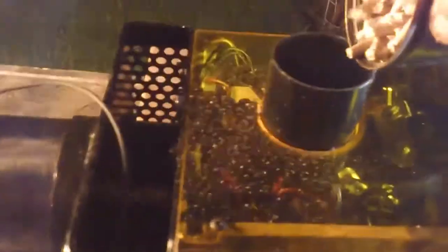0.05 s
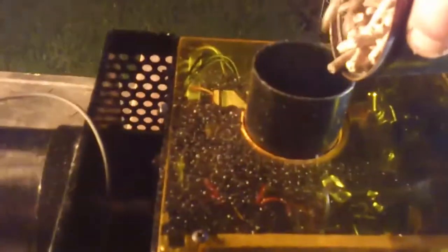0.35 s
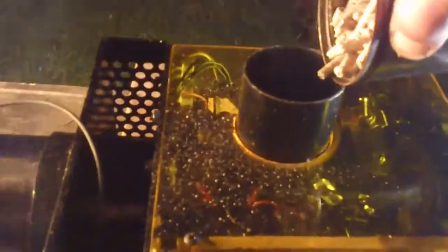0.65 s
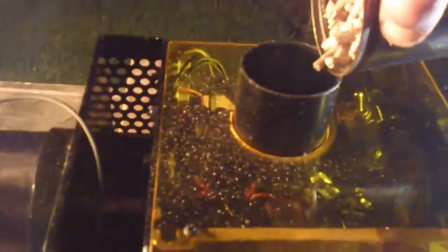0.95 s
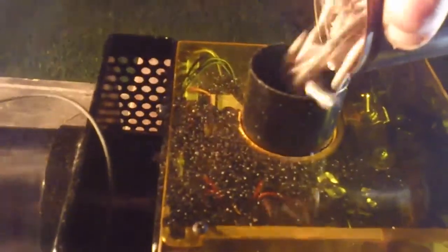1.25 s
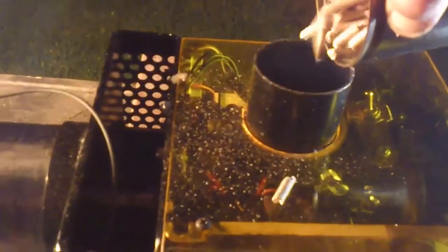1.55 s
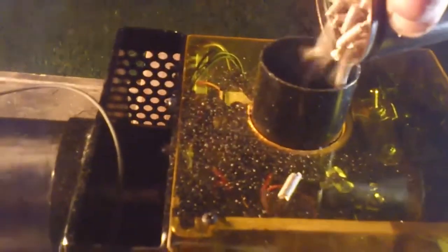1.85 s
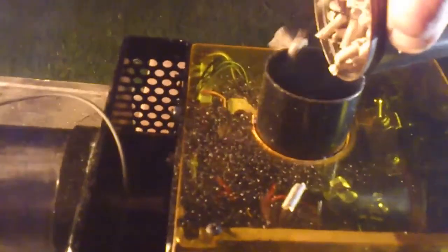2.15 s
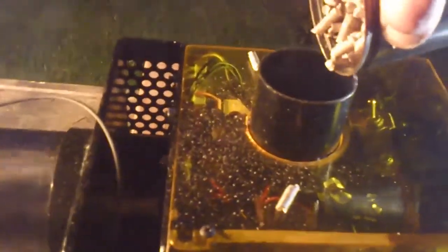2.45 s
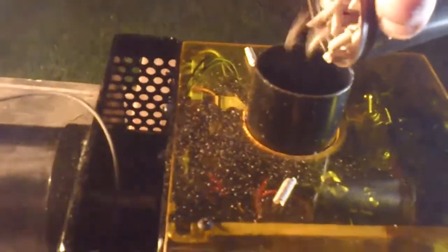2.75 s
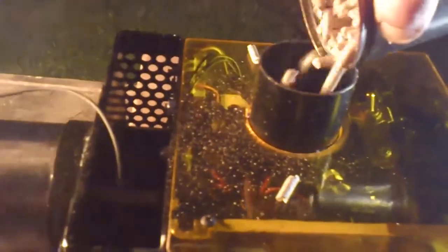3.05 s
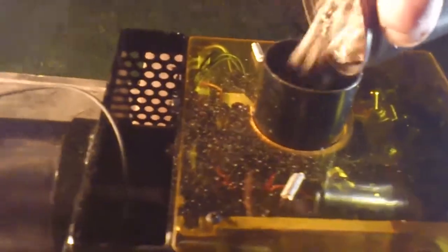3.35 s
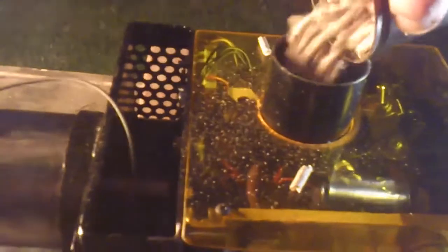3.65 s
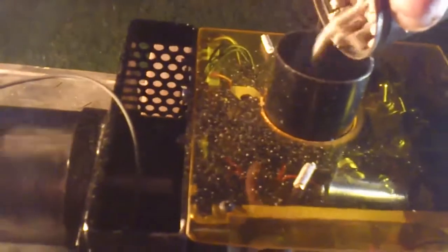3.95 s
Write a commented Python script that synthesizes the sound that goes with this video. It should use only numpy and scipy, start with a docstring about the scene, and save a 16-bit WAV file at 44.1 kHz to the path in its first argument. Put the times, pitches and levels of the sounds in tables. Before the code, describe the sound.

Wood pellets poured in spurts, clicking and ringing on a metal tube while a blower runs.

```python
"""At a steel feed tube, wood pellets are shaken from a scoop over the low roar of a running blower.
A few single pellets fall first, then two cascades. They set the tube wall ringing, knock on each
other, tick on the hard rim and thud on the housing, while the rest rustle in the scoop.
Faint high swishes glide through the lulls, and the room gives the pellets a short echo."""
import sys
import numpy as np
from scipy import signal
from scipy.fft import rfft, irfft
from scipy.io import wavfile

SR = 44100
rng = np.random.default_rng(int(sys.argv[2]) if len(sys.argv) > 2 else 0)


def master_out(mix):
    """Clip the mix to full scale and print it as 16-bit PCM to the path in sys.argv[1]."""
    frames = np.transpose(np.atleast_2d(mix))
    ceiling = np.clip(frames, -1, 1)
    pcm = np.round(ceiling * 32767).astype(np.int16)
    wavfile.write(sys.argv[1], SR, pcm)


N = 176400
TIME = np.arange(N) / SR
START_DELAY_S = 0.0008  # each hit sounds this long after its listed time
CRUSH_S = 0.00067  # a crumbly pellet builds up its force gradually
CUTOFF_HZ = 15900

# how strong the pour is over time: time_s, level_db
POUR_STRENGTH = [(0,-8),(.66,-10),(.85,-20),(1.15,-31.5),(1.3,-12),(1.45,-2),(1.58,0.5),(1.72,-3.5),(1.9,2),(2.06,-1),(2.25,-11),(2.52,-13),(2.62,-36.5),(2.92,-29.5),(3.12,-15),(3.33,-7),(3.42,-2.5),(3.66,0),(3.84,-4.5),(4,-3)]
# tone colour of a hard click: pitch_hz, level_db
CLICK_SPECTRUM = [(900,-47),(1800,6.5),(4000,3.5),(5200,3),(10000,4.5),(12500,-6),(16000,-8)]


def loud_pellets():
    """The pellets that stand out one by one, on the rim, the housing, each other and the tube wall."""
    # hits on the wall: start_s, level_db, treble_db, ring_db, place (a spot on the wall, about -1 to 1)
    wall_hits = [(.0014,-10.5,-18,5,0.29), (.134,-11,-30,-11,-0.51), (.2204,-21,-14,-3,0.17),
                 (.3296,-18,-23,-2,-0.49), (.3444,-26,-21.5,-1,-.8), (.4586,-18.5,-19,0,-1),
                 (.4826,-12,-26,1.5,-.9), (.6274,-21.5,-9,2,-0.16), (.6389,-11,-22,1,-0.45),
                 (.7233,-25,-29,2.5,-0.85), (1.3272,-15.5,-17,0.5,-0.55), (1.3835,-18,-19,-5,0.32),
                 (1.4044,-12,-14,0,-0.19), (1.421,-14,-21.5,-9,.3), (1.4322,-15.5,-22,-2,0.7),
                 (1.474,-13,-18,4,0), (1.501,-10.5,-20,-5.5,0.9), (1.572,-15,-20.5,-8,0.13),
                 (1.6305,-16,-14,-6,0.31), (1.6905,-13,-16,-6,-.3), (1.7105,-21,-30,-9,0),
                 (1.8712,-11,-21,-3,-.5), (1.9037,-13,-12,1,0), (1.926,-19.5,-18,-6,0),
                 (1.94,-17,-12,-2,0.3), (1.9695,-13.5,-17,-4,0.11), (1.989,-16,-20,3,0.15),
                 (2.0536,-23,-14,9,0.12), (2.1018,-15.5,-23,-6,.1), (2.1325,-19,-26,-3,-.3),
                 (2.193,-13,-40,2,-0.27), (2.435,-11,-32,-6,0.17), (2.4476,-23.5,-13,7,-0.44),
                 (2.5396,-18,-28,0.5,0.057), (2.6594,-28,-29,-1,-0.23), (2.8978,-14.5,-28,0,1.03),
                 (3.0798,-10.5,-17.5,0.5,-0.14), (3.1767,-12,-23,-5.5,0.6), (3.2245,-23,-20,-4,.2),
                 (3.3095,-21,-21,-2.5,0), (3.3568,-19,-22,2.5,0.75), (3.4067,-18.5,-14,3,-0.48),
                 (3.4565,-17.5,-18,-1,.1), (3.5345,-20,-24,-6,-.3), (3.5602,-15,-28,-4,0),
                 (3.6137,-23,-12,-2,-.2), (3.662,-11.5,-18,0,.2), (3.6755,-12.5,-22,-5,-.4),
                 (3.694,-18,-22,0,0), (3.7225,-17,-19,-2,.6), (3.741,-18.5,-17,-2,0),
                 (3.7714,-19.5,-10,-2.5,0.095), (3.7988,-19,-34,2,1.5), (3.845,-23.5,-24,-11,0.38),
                 (3.918,-17.5,-12,2,0.11), (3.9369,-16.5,-3,-0.5,0.82)]
    # wood on wood: start_s, level_db, pitch_hz
    wood_hits = [(0.173, -9.5, 4010), (0.278, -16, 3420), (0.3097, -14, 4780), (0.3282, -20, 6300),
                 (0.3716, -13.5, 4540), (0.3885, -11, 3520), (0.6828, -20.5, 5900), (1.0885, -26.5, 4600),
                 (1.2226, -21.5, 3860), (1.2451, -18, 4600), (1.272, -14.5, 4930), (1.288, -20.5, 4950),
                 (1.3114, -15, 3320), (1.4703, -14, 5400), (1.5191, -9, 3230), (1.551, -16, 4100),
                 (1.5979, -8.5, 3830), (1.605, -9, 3640), (1.6135, -17, 3820), (1.7625, -18.5, 4150),
                 (1.7809, -9, 3470), (1.8631, -18, 3610), (1.9683, -17, 3530), (1.98, -15, 3900),
                 (1.9986, -13.5, 5570), (2.1936, -13.5, 4500), (2.3194, -18, 4600), (2.694, -21, 4200),
                 (3.1083, -17.5, 3230), (3.2527, -15.5, 4000), (3.273, -13, 3410), (3.3668, -11, 3550),
                 (3.47, -16.5, 4120), (3.5344, -10.5, 6230), (3.5715, -16, 4800), (3.641, -17.5, 4200),
                 (3.6932, -14.5, 4060), (3.7004, -10.5, 4060), (3.7228, -14, 4140), (3.8678, -13, 3350),
                 (3.9867, -14.5, 3760)]
    # landings on the housing: start_s, level_db, pitch_hz
    housing_hits = [(1.087,-16.5,830),(1.317,-16.5,2200),(1.520,-16,1370),(1.605,-12.5,1450),(1.614,-18,1600),(2.019,-17,1290),(2.095,-21.5,1080),(3.795,-19.5,950)]
    return rim_ticks() + housing_thuds(housing_hits) + wood_knocks(wood_hits) + tube_pings(wall_hits)


def tube_pings(hits):
    """Steel cracks, clangs and rings when hit; where a pellet lands decides which tones ring most."""
    # the tube's own tones: pitch_hz, level_db, fade_s, place_gain_db (per unit of place)
    tube_tones = [(1433,-14,0.069,10), (3097,-12,0.15,10.5), (4016,-5.5,0.047,-8.5), (4835,-6,.07,-2),
                  (5630,-11,0.054,-7), (5730,-8,0.12,10), (6030,-7,0.071,4), (6180,-2,0.051,-14),
                  (6820,-7,0.092,4), (6985,-9.5,.11,-2.5), (7570,-9.5,0.18,-5), (7690,-9.5,0.094,-1),
                  (8320,-7.5,0.18,-5), (8870,-8,0.084,-2), (8800,-5.5,0.082,-6), (9280,-2.5,0.11,0),
                  (10561,-7,0.045,-1), (11600,-19,0.048,4), (12100,-18.5,.055,1)]
    # tone colour of the wall's dense, short clang: pitch_hz, level_db
    clang_spectrum = [(900,-3.5),(2500,-7.5),(3600,0),(6000,6),(7500,-1),(9000,2.5),(10500,-0.5),(12000,-17),(16000,-23)]
    out = np.zeros(N)
    start_s, level_db, treble_db, ring_db, place = np.transpose(hits)
    starts = np.clip(((start_s + START_DELAY_S) * SR).astype(int), 0, N - 1)
    chance = rng.standard_normal((len(hits), len(tube_tones), 2, 2))
    for k, (hz, tone_db, fade_s, place_gain_db) in enumerate(tube_tones):
        strength_db = level_db + ring_db + tone_db + place * place_gain_db + treble_lift(treble_db, hz)
        # each tone is a close pair, and the upper twin is weaker
        for twin, (detune, twin_db) in enumerate([(-0.0021, -20), (0.0021, -23.5)]):
            size, sign = chance[:, k, twin].T
            force = from_db(strength_db + twin_db + 6 * np.clip(size, -1, 1)) * np.sign(sign)
            clicks = np.bincount(starts, force, N)
            out += ring(clicks, hz * (1 + detune * rng.random()), fade_s)
    for start_s, level_db, treble_db, _, _ in hits:
        colour = lambda f: at_hz(clang_spectrum, f) + treble_lift(treble_db, f)
        crack = from_db(level_db - 8) * burst(colour, fade_s=0.011)
        clang = from_db(level_db - 10.5) * burst(colour, fade_s=0.07)
        add(out, start_s, crack + clang)
    return out


def treble_lift(treble_db, hz):
    """Harder hits reach higher: a change in dB that acts mostly above 10 kHz."""
    return (treble_db + 26.5) * at_hz([(10000, 0.089), (12000, 1)], hz)


def wood_knocks(hits):
    """Two pellets meet with a crack, a clink and a snap, near a pitch set by the pellet's length."""
    out = np.zeros(N)
    for start_s, level_db, hz in hits:
        dull_db = 0.68 * min(level_db - 1, 0)  # gentle knocks lose treble
        treble_loss = lambda f: at_hz([(7000, 0), (13000, dull_db)], f)
        click = lambda f: from_db(at_hz(CLICK_SPECTRUM, f) - 8)
        colour = lambda f: hump(f, hz, width_oct=0.38, floor=click(f)) + treble_loss(f)
        crack = burst(colour, fade_s=0.0093)
        bending_hz = hz * 2 ** (0.22 * rng.uniform(-0.9, 1, 3))  # the pellet flexes at three pitches
        clink = sum(fading_tone(f, fade_s=0.025, size=2048) for f in bending_hz)
        snap = fading_tone(hz, fade_s=0.00022, size=256)  # the spike of contact
        add(out, start_s, from_db(level_db - 3) * crack)
        add(out, start_s, from_db(level_db - 14.5) * clink)
        add(out, start_s + CRUSH_S, from_db(level_db - 4) * snap)
    return out


def rim_ticks():
    """The hard rim answers at once with a bright click."""
    # hits on the rim: start_s, level_db, body_db (more body gives more sound below about 4 kHz)
    rim_hits = [(0.1716, -16.5, -13), (1.7417, -9.5, -20), (1.7738, -11, -11), (1.8345, -23, -20),
                (1.9172, -13, -34), (2.036, -19.5, -26), (2.053, -15.5, -33), (2.332, -15.5, -14.5),
                (2.363, -9.5, -15.5), (2.4702, -10, -15.5), (2.514, -12.5, -15), (2.8978, -16, -22),
                (3.057, -18, -30), (3.2345, -20.5, -17.5), (3.287, -20.5, -19), (3.48, -20, -22.5),
                (3.5348, -16, -9), (3.548, -20, -15), (3.593, -20, -30), (3.662, -15, -26),
                (3.908, -20, -11)]
    out = np.zeros(N)
    for start_s, level_db, body_db in rim_hits:
        colour = lambda f: at_hz(CLICK_SPECTRUM, f) + at_hz([(3500, body_db + 10), (5500, 0)], f)
        add(out, start_s, from_db(level_db - 5) * burst(colour, fade_s=0.021, rise_s=0.0001))
    return out


def housing_thuds(hits):
    """Pellets land on the housing with a duller, hollow sound."""
    return from_db(-7) * taps(hits, width_oct=0.57, fade_s=0.042)


def pour():
    """The mass of small contacts in the pour, over the rustle of the scoop."""
    rustle = scoop_rustle()
    treble_db, ring_db = -28.5, -2  # glancing touches ring less; they land anywhere on the wall
    pings = tube_pings([(start_s, level_db, treble_db, ring_db, rng.uniform(-1.2, 1))
                        for start_s, level_db in random_hits(per_s=160, level_db=-26)])
    knocks = wood_knocks(with_pitch(random_hits(per_s=100, level_db=-28), hz=3750, spread_oct=0.445))
    thuds = housing_thuds(with_pitch(random_hits(per_s=70, level_db=-32), hz=1490, spread_oct=0.445))
    splinter_hits = with_pitch(random_hits(per_s=140, level_db=-26.5), hz=10200, spread_oct=0.41)
    splinters = taps(splinter_hits, width_oct=0.41, fade_s=0.0067)
    return rustle + pings + knocks + thuds + splinters


def random_hits(per_s, level_db):
    """Rows of start_s, level_db. The settings are for full flow; less flow gives fewer, softer hits."""
    flow_db = np.interp(TIME, *np.transpose(POUR_STRENGTH))
    lands = rng.random(N) < per_s * from_db(flow_db) / SR
    size_db = 3.5 * np.clip(rng.standard_normal(N), -2, 2)
    return np.column_stack([TIME, level_db + flow_db / 2 + size_db])[lands]


def with_pitch(hits, hz, spread_oct):
    """Give every hit a random pitch of its own, near hz."""
    return np.column_stack([hits, hz * 2 ** (spread_oct * rng.uniform(-0.93, 1, len(hits)))])


def scoop_rustle():
    """Pellets slide over each other in the scoop, louder as the pour grows."""
    # tone colour of the sliding: pitch_hz, level_db
    rustle_spectrum = [(1000,-2),(3000,1),(5000,5),(9000,-10),(11000,-4),(16000,2)]
    flow_db = np.interp(TIME, *np.transpose(POUR_STRENGTH))
    return from_db(flow_db - 44) * noise(lambda f: at_hz(rustle_spectrum, f), N)


def blower():
    """Moving air makes a steady low roar with a few humming tones in it."""
    # tone colour of the roar: pitch_hz, level_db
    roar_spectrum = [(15,-22),(30,-3),(50,-8),(75,-7),(110,-4.5),(160,-0.5),(195,-1.5),(230,-5),(275,-2),(335,1.5),(395,-3.5),(455,-0.5),(550,-9.5),(750,-10),(900,-22),(1030,-19.5),(1180,-26.5),(1450,-24),(2000,-31),(2700,-41),(5000,-41),(8500,-48),(11000,-52),(16000,-99)]
    # narrow tones at which the blower hums: pitch_hz, level_db
    hum_tones = [(344,-40.5),(452,-39.5),(1480,-57)]
    hum = sum(from_db(level_db) * airy_tone(hz, width_hz=26.4) for hz, level_db in hum_tones)
    roar = from_db(-23.5) * noise(lambda f: at_hz(roar_spectrum, f), N)
    return roar + hum


def swishes():
    """Thin, high swishes swell, glide in pitch and fade."""
    # one row for each swish: level_db, list of (time_s, pitch_hz)
    glides = [(-49.5, [(.3,7860),(.42,8800),(.5,8900),(.62,8350),(.76,8500),(.87,8650),(.99,7600)]),
              (-58, [(.72,7300),(.88,7400),(.96,6900),(1.04,6400)]),
              (-56, [(2.66,7300),(2.72,7100),(2.78,7900),(2.83,7400)])]
    out = np.zeros(N)
    for level_db, glide in glides:
        time_s, pitch_hz = np.transpose(glide)
        progress = np.clip((TIME - time_s[0]) / (time_s[-1] - time_s[0]), 0, 1)
        swell = 2 * np.sqrt(progress * (1 - progress))
        out += from_db(level_db) * swell * airy_tone(np.interp(TIME, time_s, pitch_hz), width_hz=230)
    return out


def room_echo():
    """The room's short, blurred answer to one click, with a total energy of 1."""
    tail = burst(lambda f: at_hz([(4000, 19), (16000, -2)], f), fade_s=0.17, size=16384)
    return tail / np.sqrt(np.sum(tail ** 2))


def taps(hits, width_oct, fade_s):
    """Short contacts, each a burst of noise around its own pitch."""
    out = np.zeros(N)
    for start_s, level_db, hz in hits:
        add(out, start_s, from_db(level_db) * burst(lambda f: hump(f, hz, width_oct), fade_s))
    return out


def burst(colour, fade_s, rise_s=CRUSH_S, size=4096):
    """Fading noise: many close tones struck at once, with a different uneven colour each time."""
    t = TIME[:size]
    bands_hz = np.linspace(0, CUTOFF_HZ, 28)
    uneven_db = 3 * rng.standard_normal(len(bands_hz))
    grain = noise(lambda f: colour(f) + np.interp(f, bands_hz, uneven_db), size)
    return grain * fade(t, fade_s) * (1 - np.exp(-t / rise_s))


def ring(clicks, hz, fade_s):
    """Each click starts a fading tone as strong as the click."""
    shrink, angle = fade(1 / SR, fade_s), 2 * np.pi * hz / SR  # per sample
    return signal.lfilter([0, np.sin(angle)], [1, -2 * shrink * np.cos(angle), shrink ** 2], clicks + 1e-18)


def fading_tone(hz, fade_s, size):
    """One pure tone that dies away, size samples long."""
    t = TIME[:size]
    return np.sin(2 * np.pi * hz * t) * fade(t, fade_s)


def airy_tone(hz, width_hz):
    """A narrow, restless band of noise around a pitch."""
    phase = 2 * np.pi * np.cumsum(hz * np.ones(N)) / SR
    slow = lambda f: -20 * np.log10(1 + (f / width_hz) ** 2)
    return noise(slow, N) * np.cos(phase) + noise(slow, N) * np.sin(phase)


def noise(colour, size):
    """Noise of strength 1 (rms); colour(hz) says in dB how much of each pitch it holds."""
    hz = np.maximum(np.arange(size // 2 + 1) * SR / size, 1)
    shaped = irfft(rfft(rng.standard_normal(size)) * from_db(colour(hz)), size)
    return shaped / shaped.std()


def hump(f, hz, width_oct, floor=1e-3):
    """A tone colour in dB: a broad hill around hz, standing on a low floor."""
    return 20 * np.log10(np.exp(-0.5 * (np.log2(f / hz) / width_oct) ** 2) + floor)


def at_hz(points, hz):
    """Read between a table's points, with pitch counted in octaves."""
    pitches, values = np.transpose(points)
    return np.interp(np.log(hz), np.log(pitches), values)


def fade(t, fade_s):
    """A gain that falls by 60 dB in fade_s seconds."""
    return np.exp(-np.log(1000) * t / fade_s)


def from_db(db):
    """Turn decibels into a gain."""
    return 10 ** (np.asarray(db) / 20)


def add(out, start_s, sound):
    """Mix a sound in, just after start_s."""
    i = int(np.clip((start_s + START_DELAY_S) * SR, 0, N - 1))
    out[i:i + len(sound)] += sound[:N - i]


def scene():
    """The pellets and their echo, over the blower and the swishes."""
    background = blower() + swishes()
    room = room_echo()
    pellets = loud_pellets() + pour()
    echo = from_db(-18) * signal.fftconvolve(pellets, room)[:N]
    return (pellets + echo + background)[None]


def record(dry):
    """Cut the very highest treble steeply."""
    return signal.sosfilt(signal.ellip(10, 0.1, 80, CUTOFF_HZ, fs=SR, output="sos"), dry)


dry = scene()
out = record(dry)
master_out(out)
```